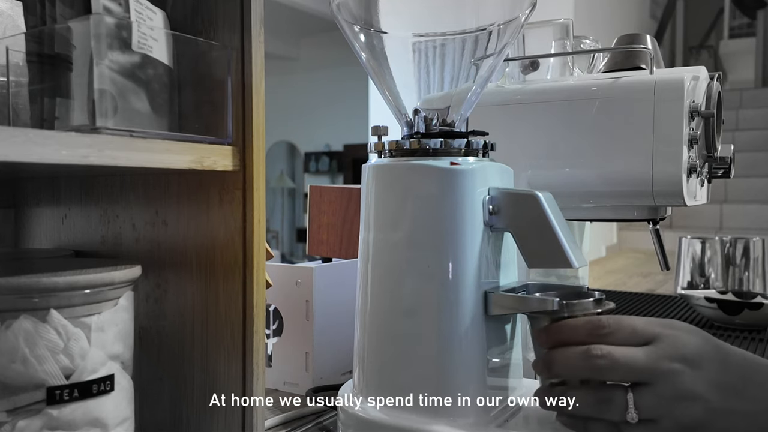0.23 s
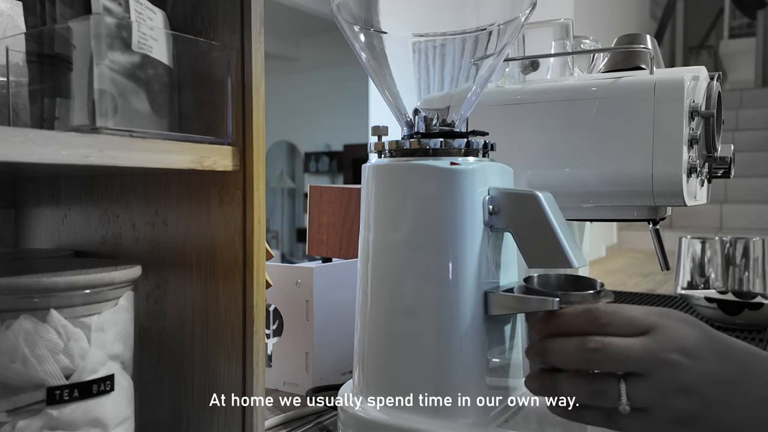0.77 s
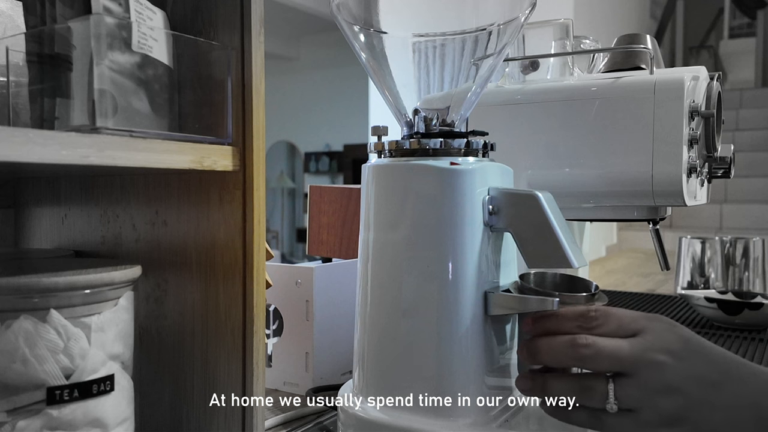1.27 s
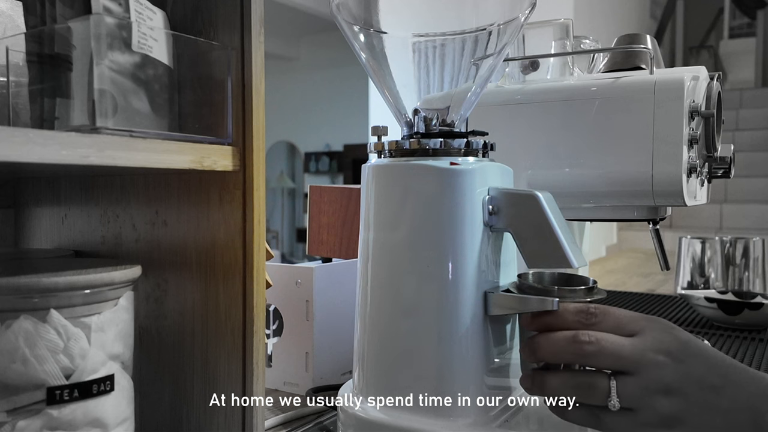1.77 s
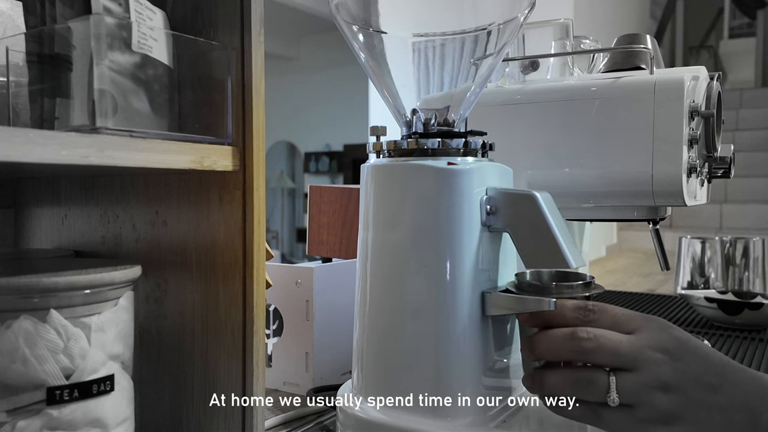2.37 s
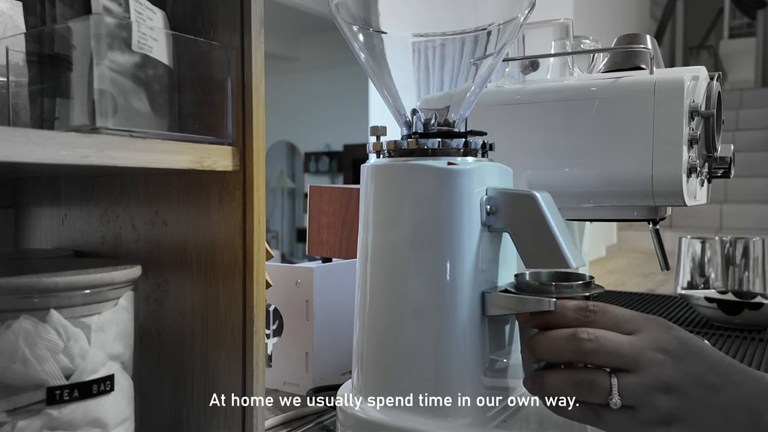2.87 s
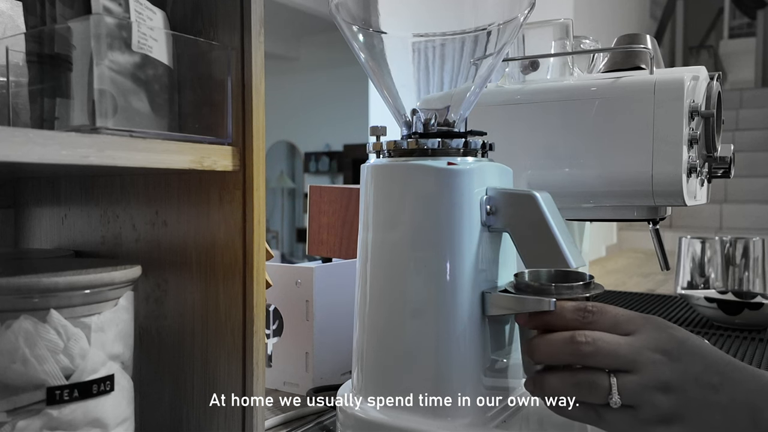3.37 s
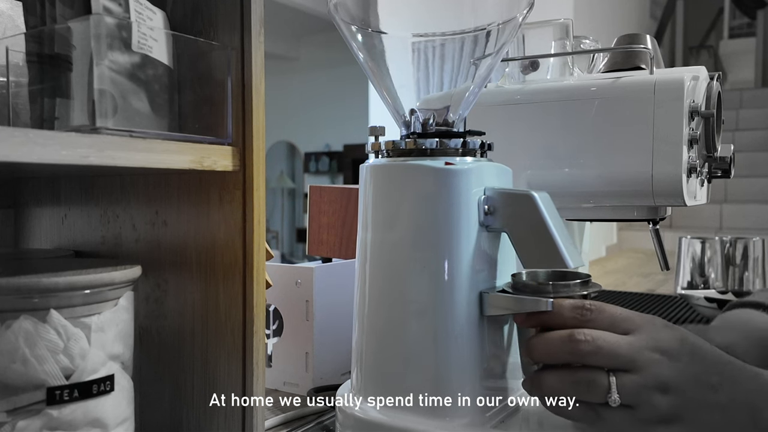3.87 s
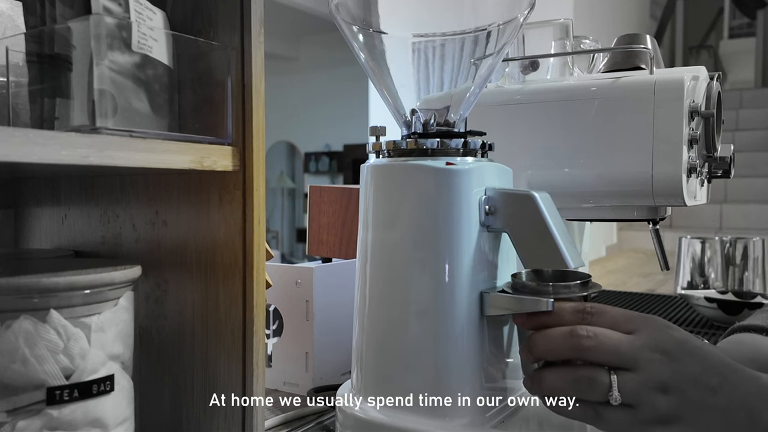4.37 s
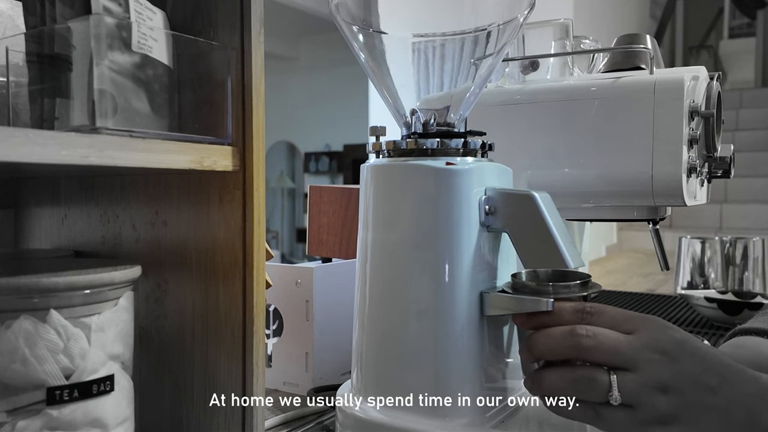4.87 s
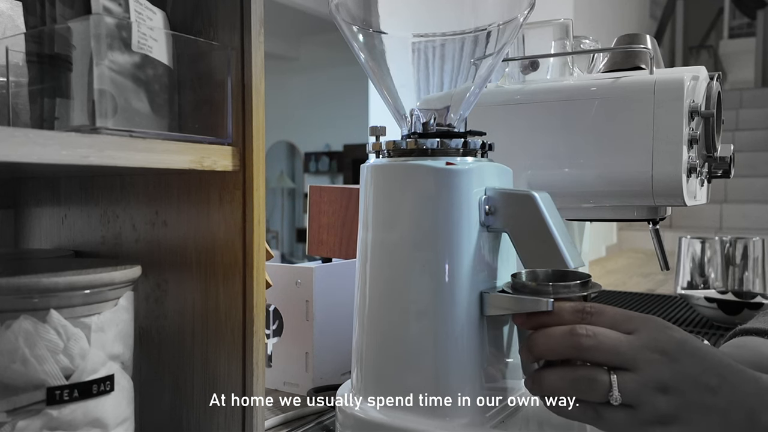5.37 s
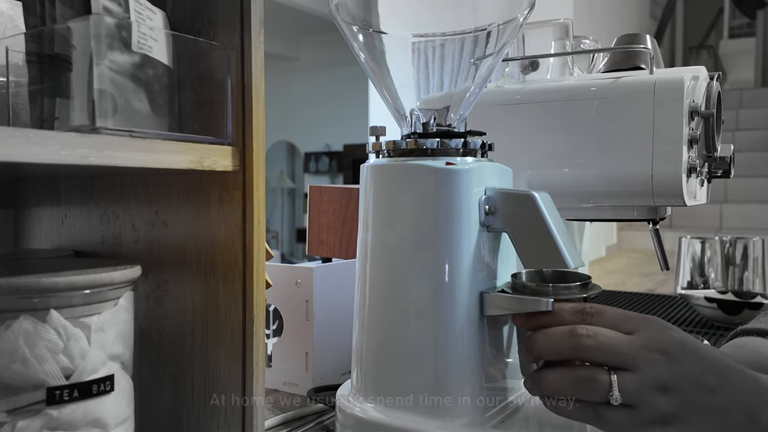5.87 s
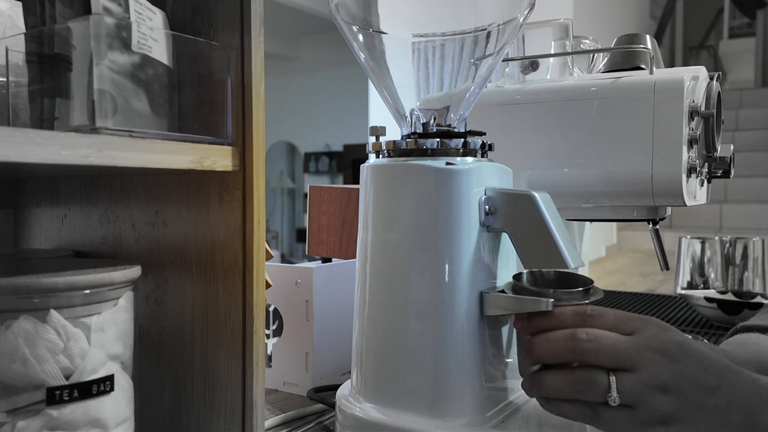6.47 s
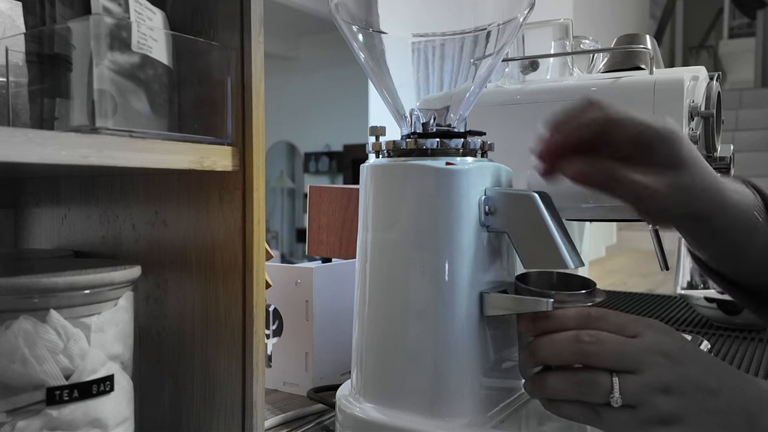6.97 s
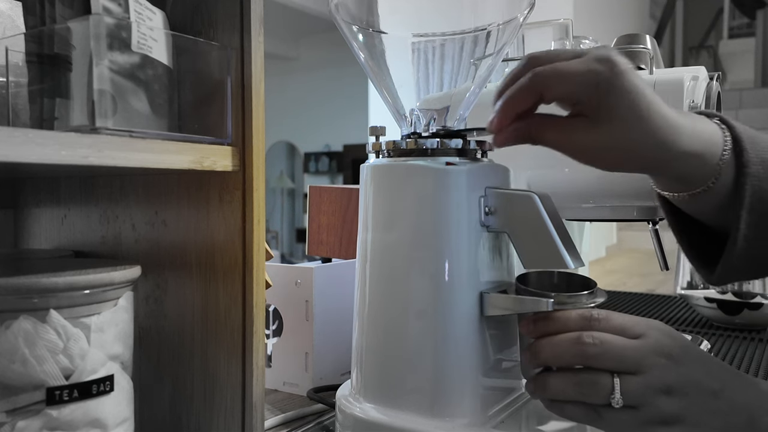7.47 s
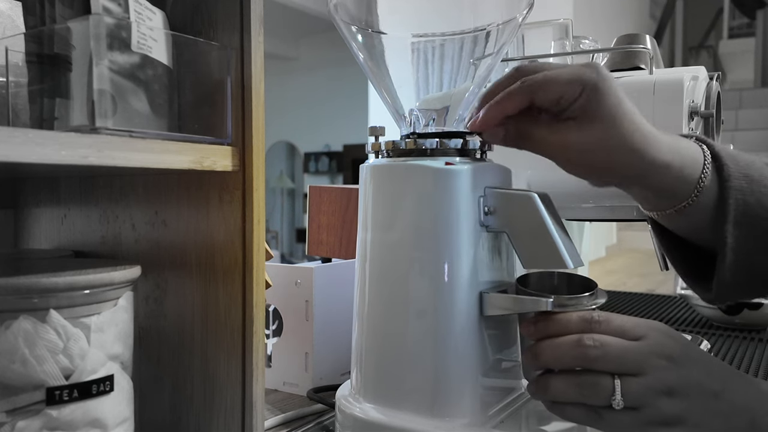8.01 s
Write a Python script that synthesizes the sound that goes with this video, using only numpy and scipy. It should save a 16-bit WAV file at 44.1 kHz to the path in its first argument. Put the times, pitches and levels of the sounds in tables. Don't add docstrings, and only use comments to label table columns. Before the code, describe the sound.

Metal filter handle knocks into a grinder fork, coffee beans grind in a short burst and a longer loud run, then collar clicks.

```python
import sys
import numpy as np
from scipy import signal
from scipy.fft import rfft, irfft, next_fast_len
from scipy.io import wavfile
from scipy.ndimage import map_coordinates

SR = 44100
rng = np.random.default_rng(int(sys.argv[2]) if len(sys.argv) > 2 else 0)


def transcribe(signal):
    frames = np.atleast_2d(signal).T
    limited = np.clip(frames, -1, 1)
    pcm = np.round(limited * 32767).astype(np.int16)
    wavfile.write(sys.argv[1], SR, pcm)


def ratio(d):
    e = np.asarray(d, float) / 20
    return 10 ** e


N = 363560
FULL_TURNS_PER_S = 140

# (on [s], off [s], spin-up time [s], coast time [s], first bite after on [s])
RUNS = [
    (2.2, 2.582, .036, .105, .016),
    (3.898, 6.559, .055, .075, .024),
]
# (frequency [Hz], width [Hz], level [dB])
FIZZ = [(6300, 480, 2), (9200, 1800, 0.5), (12500, 4000, -5)]


def unit(x):
    return x / np.sqrt(np.mean(x ** 2) + 1e-20)


def along(points, hz):
    f, v = np.transpose(points)
    return np.interp(np.log(hz + 1), np.log(f + 1), v)


def curves(tables, before):
    t = np.arange(N) / SR
    s, *cols = np.transpose(sorted(np.vstack(tables).tolist()))
    out = [np.interp(t, s, c) for c in cols]
    inside = sum((t >= rows[0][0]) & (t <= rows[-1][0]) for rows in tables)
    return [np.where(inside, out[0], before)] + out[1:]


def wobble(rate):
    knots = rng.standard_normal(int(N * rate / SR) + 4)
    return map_coordinates(knots, [np.arange(N) * rate / SR])


def filtered(x, response):
    m = next_fast_len(N + SR // 2)
    return irfft(rfft(x, m) * response(np.fft.rfftfreq(m, 1 / SR)), m)[..., :N]


def mode(f, hz, width):
    return 1j * f * width / (hz * hz - f * f + 1j * f * width)


def body(modes):
    return lambda f: sum((-1) ** k * ratio(db) * mode(f, hz, w) for k, (hz, w, db) in enumerate(modes))


def grit(rate, spread_db):
    hit = rng.random(N) < rate / SR
    return hit * rng.standard_normal(N) * ratio(spread_db * rng.exponential(size=N))


def kitchen():
    # (frequency [Hz], density [dB per Hz])
    rumble = [(15, -72), (25, -37), (43, -36), (55, -15), (101, 0), (126, -8.5), (152, -2.5), (260, -12.5),
              (340, -18.5), (523, -29), (742, -26.5), (872, -40), (971, -33.5), (2360, -38), (15500, -57)]
    # (frequency [Hz], left-right correlation)
    alike = [(60, 0.99), (180, 0.99), (550, 0.86), (1650, -0.43), (4970, -0.19), (15000, -0.24)]
    turn = lambda f: np.arccos(np.clip(along(alike, f), -1, 1)) / 2
    split = lambda f: ratio(along(rumble, f)) * [np.cos(turn(f)), np.sin(turn(f))]
    mid, side = filtered(rng.standard_normal((2, N)), split)
    fridge = ratio(-43 + 2.5 * wobble(7)) * np.sin(2 * np.pi * 100 * np.arange(N) / SR)
    return ratio(-39.5 + 0.5 * wobble(1.2)) * unit(np.array([mid + side, mid - side])) + fridge


def taps(events, bodies, rise_s, rattle, low_db, knock_db):
    push, t = np.zeros((len(bodies), N + SR)), np.arange(SR // 4) / SR
    for s, db, weight_db, tick_db, t60_s in events:
        lasts_s = np.clip(t60_s, .008, .15) * np.array([[1], [rattle], [1], [1]])
        burst = rng.standard_normal((len(bodies), len(t))) * ratio(-60 * t / lasts_s)
        burst *= 1 - np.exp(-t / rise_s)
        body_db = np.array([[11], [weight_db + low_db], [weight_db + knock_db], [tick_db + 6]])
        push[:, round(s * SR):][:, :len(t)] += ratio(db + body_db) * burst
    return sum(filtered(p[:N], body(b)) for p, b in zip(push, bodies))


def handle():
    # (time [s], peak level [dB], weight [dB], tick [dB], t60 [s])
    knocks = [(0.2374, -18.5, -13, -28, 0.045), (0.2544, -26.5, -10, -34, 0.039),
              (0.5342, -49.5, 4.5, -20, 0.08), (0.8849, -14, -0.5, -17.5, 0.037),
              (0.8969, -13.5, -3, -23.5, 0.051), (0.9264, -30, 7, -21.5, 0.048),
              (0.9644, -39.5, 6, -21.5, 0.019), (0.9934, -40, 8.5, -27, 0.036),
              (1.04, -51.5, 12.5, -28, 0.11), (1.075, -46.5, 1, -25.5, 0.017),
              (1.1341, -55.5, 6.5, -10.5, 0.034), (3.5133, -58.5, 10, -16.5, 0.021),
              (3.8085, -46, -10, -4.5, 0.03)]
    # (time [s], peak level [dB], weight [dB], tick [dB], t60 [s])
    presses = [
        (2.182, -49.5, -11.5, -9, 0.18),
        (2.199, -11, -20, -5.5, 0.037),
        (3.884, -51, -5.5, -13, 0.2),
        (3.891, -36.5, -20, -6.5, 0.03),
        (6.765, -35.5, -5.5, -17.5, 0.044),
    ]
    # (frequency [Hz], width [Hz], level [dB])
    steel = [(1420, 450, -1), (2190, 480, 0.5), (3230, 420, -3), (3800, 420, -3), (5270, 2000, -11.5)]
    # (frequency [Hz], width [Hz], level [dB])
    counter = [(238, 36, 0), (290, 18, -1.5), (337, 11, -0.5)]
    # (frequency [Hz], width [Hz], level [dB])
    fork = [(620, 35, 5), (692.6, 12, 8.5), (810, 90, -4), (940, 220, -6.5)]
    return taps([*knocks, *presses], [steel, counter, fork, FIZZ],
                rise_s=0.00026, rattle=6.0, low_db=21.5, knock_db=25)


def shaft():
    # (time [s], speed lost [turns per s])
    load = [(2.45, -2.5), (2.51, 4), (2.56, -1), (4.07, 1), (4.8, 4), (5.05, -1), (5.6, 1), (6.5, -1)]
    kick_turns_per_s = 88
    t, speed = np.arange(N) / SR, np.zeros(N)
    for on, off, up_s, coast_s, _ in RUNS:
        rising = FULL_TURNS_PER_S - (FULL_TURNS_PER_S - kick_turns_per_s) * np.exp(-np.abs(t - on) / up_s)
        speed += (t >= on) * rising * np.exp(-np.clip(t - off, 0, None) / coast_s)
    return np.clip(speed * (1 - np.interp(t, *np.transpose(load)) / FULL_TURNS_PER_S), 1, None)


def feed():
    grab_s, bite_s, bite_db = .007, .009, -6.5
    stall_s, stall_db_per_s = 0.062, 297
    trickle_db, trickle_t60_s = -24.5, .6
    t, filled, bite = np.arange(N) / SR, 0, 0
    for on, off, _, _, after in RUNS:
        empty_s = np.clip(t - off - stall_s, 0, None)
        fade = ratio(-stall_db_per_s * empty_s) + ratio(trickle_db - 60 * empty_s / trickle_t60_s)
        filled += np.clip((t - on) / grab_s, 0, 1) ** 2 * fade
        bite += ratio(bite_db) * np.exp(-((t - on - after) / bite_s) ** 2)
    return filled, bite


def housing(f):
    # (frequency [Hz], width [Hz], boost [dB])
    casing = [(635, 210, 7), (1000, 60, 11), (1230, 58, 1.5), (1417, 120, 3.5), (1750, 76, 6.5),
              (2020, 130, 6.5), (2436, 102, 7), (2850, 220, 1.5), (3390, 17, 7), (4350, 90, 2),
              (4510, 33, 3.5), (7300, 190, -3.5), (6260, 140, 4)]
    return np.prod([1 + (ratio(db) - 1) * mode(f, hz, w) for hz, w, db in casing], axis=0)


def commutator(speed, turns):
    # (multiple of bar rate, level [dB])
    multiples = [(1, 2.5), (2, 3), (3, -4.5), (4, -18)]
    bars = 16
    slow = np.clip(1 - speed / FULL_TURNS_PER_S, 0, .22)
    blur = np.clip(1 - 6 * slow, .22, 1)
    slip = 0.71 * blur * wobble(300)
    whine = 0
    for k, db in multiples:
        level_db = db - 36.5 * k * slow + 3.86 * blur * wobble(120)
        whine = whine + ratio(level_db) * np.sin(k * (2 * np.pi * bars * turns + slip))
    whine *= 1 + 0.21 * np.cos(2 * np.pi * turns)
    return whine * ratio(92 * slow) * np.clip((speed - 42) / 25, 0, 1)


def burrs(speed, turns, crush_gain, fines_gain, whine_gain, thud_gain):
    # (frequency [Hz], density [dB per Hz])
    crush_curve = [(35, -52.5), (60, -26.5), (96, -11), (170, -11.5), (194, -5.5), (294, -10), (528, -20),
                   (701, -7), (896, -14.5), (1210, 0), (1580, -2.5), (2260, -5.5), (3630, -7), (4470, -5),
                   (5500, -12.5), (7150, -42.5), (12100, -120)]
    # (frequency [Hz], density [dB per Hz])
    fines_curve = [(2820, -32), (4800, -7), (5510, -13), (6230, -12), (6670, -8.5), (8000, -10.5),
                   (9270, -9), (14600, -20), (15500, -16.5)]
    crush = unit(filtered(grit(9000, spread_db=1.57), lambda f: ratio(along(crush_curve, f)) * housing(f)))
    fines = unit(filtered(grit(16000, spread_db=2.5), lambda f: ratio(along(fines_curve, f)) * housing(f)))
    thud = filtered(crush, lambda f: 1 / (1 + (f / 2400) ** 4))
    out = thud_gain * thud
    out += crush_gain * ratio(-1.0 + 0.38 * wobble(25) + 1.4 * wobble(90)) * crush
    out += fines_gain * ratio(0.54 * wobble(25)) * fines
    return out + whine_gain * filtered(commutator(speed, turns), housing)


def cracks():
    # (time [s], peak level [dB], frequency [Hz])
    splits = [(2.2114, -3, 2162), (2.2124, 2, 1207), (2.3365, 1, 1000), (2.4514, -5.5, 2310),
              (2.4834, -2.5, 2092), (2.5854, -3.5, 2070), (3.908, -0.5, 2030), (3.9287, -1, 1730),
              (3.9556, -4, 2020), (3.9968, -5, 2050), (4.0981, -1.5, 2104), (4.4044, -3, 2060),
              (4.4438, -2.5, 2078), (4.5396, -2, 1728), (4.591, -4.5, 2040), (4.6734, -5.5, 1314),
              (4.7694, -4, 1256), (4.8299, -2, 2190), (5.1974, -7, 2160), (5.229, -1.5, 1713),
              (5.2752, 0.5, 1263), (5.4405, -5, 1702), (5.4914, -6.5, 2030), (5.5337, -5, 2260),
              (5.5894, -3.5, 2205), (5.7598, -3.5, 1716), (5.9888, -2, 2240), (6.0871, 0.5, 1214),
              (6.2023, -2, 2220), (6.5763, -1.5, 1700)]
    t60_s, rise_s, snap_t60_s = .02, .0009, .012
    out, t = np.zeros(N), np.arange(SR // 30) / SR
    for s, db, hz in splits:
        snap = np.sin(2 * np.pi * hz * t) + 0.51 * rng.standard_normal(len(t)) * ratio(-60 * t / snap_t60_s)
        out[round(s * SR):][:len(t)] += ratio(db + 1.5 - 60 * t / t60_s) * (1 - np.exp(-t / rise_s)) * snap
    return out


def grinder():
    speed, (filled, bite) = shaft(), feed()
    turns = np.cumsum(speed * (1 + .012 * wobble(30) + .008 * wobble(6))) / SR
    load_db = 0.79 * wobble(16) + 0.64 * wobble(40)
    decades = np.log10(speed / FULL_TURNS_PER_S)
    crush_gain = filled * ratio(-14 + 16 * decades)
    fines_gain = filled * ratio(-22.5 + 12 * decades)
    whine_gain = filled * ratio(-26.5 + 33 * decades)
    drag = filled * ratio(-18) * np.abs(1 - speed / FULL_TURNS_PER_S)
    gains = crush_gain, fines_gain, whine_gain, bite + drag
    near, far = ratio(load_db) * np.array([burrs(speed, turns, *gains), burrs(speed, turns, *gains)])
    rotor = np.sin(2 * np.pi * turns + 0.84 * wobble(10))
    near += crush_gain * ratio(-21 + 2.2 * wobble(9)) * rotor
    return near + cracks(), far


def hum():
    # (frequency [Hz], level [dB])
    mains = [(100, -31.5), (200, -36), (300, -41), (500, -60.5)]
    t, on = np.arange(N) / SR, 0
    for start, stop, *_ in RUNS:
        gate = np.clip((t - start) / .004, 0, 1) * np.clip((stop - t) / .03, 0, 1)
        on = on + gate * (1 + 3.2 * np.exp(-abs(t - start) / 0.02))
    return on * sum(ratio(db + 1.5 + 1.9 * wobble(9.9)) * np.sin(2 * np.pi * hz * t) for hz, db in mains)


def scrape(modes):
    shape = body(modes)
    return unit(filtered(grit(2500, spread_db=2.0), lambda f: shape(f) * np.abs(shape(f)) ** .8))


def collar():
    # (time [s], pressure [dB], dryness [dB])
    rub = [
        [(7.362, -57.5, -4), (7.455, -57.5, 3), (7.466, -44, 8), (7.49, -59.5, 0), (7.513, -56.5, -2),
         (7.565, -43.5, 1), (7.597, -39, -4.5), (7.639, -41.5, 8), (7.69, -58.5, -1.5)],
        [(7.8, -56.5, 5), (7.814, -49.5, 1.5), (7.86, -54.5, 5), (7.9, -47, 0), (7.925, -46, 2.5),
         (7.98, -72, -9)],
        [(8.14, -70, 2), (8.175, -61, -2), (8.22, -70, -2)],
    ]
    # (frequency [Hz], width [Hz], level [dB])
    rim = [(1890, 220, -7.5), (2440, 270, -3.5), (3230, 350, -0.5), (4180, 1000, -7.5), (5940, 600, -14.5)]
    # (frequency [Hz], width [Hz], level [dB])
    hopper = [
        [(740, 110, 5.5)],
        [(1030, 98, 0), (1500, 650, -24.5)],
    ]
    # (time [s], peak level [dB], weight [dB], tick [dB], t60 [s])
    detents = [(7.228, -33.5, -8.5, -23, 0.073), (7.3683, -33.5, -21, -12, 0.03),
               (7.432, -36, -12.5, -6.5, 0.026), (7.4644, -33, -32.5, -4.5, 0.027),
               (7.576, -26.5, -20, -11.5, 0.026), (7.5927, -18.5, -3.5, -16, 0.062),
               (7.636, -26.5, -8, -2.5, 0.019), (7.8092, -36, -4.5, -6.5, 0.03),
               (7.9052, -28.5, -5.5, -10.5, 0.096), (7.9244, -31, 2, -14, 0.034),
               (7.9488, -37.5, 1.5, -31, 0.03)]
    # (time [s], level [dB], frequency [Hz], t60 [s])
    pings = [(7.946, -41, 1980, 0.18), (7.905, -39.5, 1980, 0.11), (7.885, -52, 2400, 0.142),
             (7.8, -53.5, 2800, .15), (7.805, -51.5, 760, .15), (7.512, -51, 2450, 0.3),
             (0.994, -35, 665, .4), (1.085, -46, 660, .8), (7.515, -45.5, 700, .1), (7.648, -46, 680, 0.27),
             (7.6, -41, 1080, 0.26), (0.93, -36.5, 345, .3), (7.594, -41, 2800, 0.16),
             (7.81, -49, 9200, 0.14), (7.915, -40.5, 9400, 0.077), (7.54, -45.5, 3800, .1),
             (7.89, -50.5, 4900, 0.047)]
    rim_db, dry_db = curves(rub, before=-120)
    ring = scrape(rim[3:])
    ring += ratio(-3.5 - 2.0 * dry_db) * scrape(rim[:2])
    ring += ratio(-5 + 1.5 * wobble(25)) * scrape(rim[2:3])
    ring += ratio(-5.5 + .6 * dry_db) * scrape(FIZZ)
    ring += ratio(-6 - dry_db + 3 * wobble(22)) * scrape(hopper[0])
    out = ratio(rim_db - 0.5 + 1.5 * wobble(40)) * ring
    out += taps(detents, [rim, *hopper, FIZZ], rise_s=.0012, rattle=1.1, low_db=19.5, knock_db=18.5)
    t = np.arange(SR // 4) / SR
    for s, db, hz, t60_s in pings:
        level = ratio(db - 60 * t / t60_s + 4.4 * wobble(60)[:len(t)])
        out[round(s * SR):][:len(t)] += level * np.sin(2 * np.pi * hz * t + .7 * wobble(90)[:len(t)])
    return out


def pair(near, far, leads):
    # (frequency [Hz], share)
    shared = [(60, 0.92), (200, 1), (400, 0.9), (700, 0.93), (1400, 0.93), (3000, 0.44), (6000, 0.7),
              (10000, 0.5), (15000, 0.28)]
    # (frequency [Hz], left minus right [dB])
    sides = [(60, -1.5), (500, 1.5), (1170, -0.5), (1800, -1.5), (2400, -5.5), (3200, 1), (3800, 0),
             (6500, -2.5), (10500, 1), (14800, -2)]
    turn = lambda f: np.arccos(np.clip(along(shared, f), 0, 1)) / 2
    lead = lambda f: np.exp(.5j * along(leads, f) / (1 + (330 / (f + 1)) ** 4) * np.array([[1], [-1]]))
    side = lambda f: lead(f) * ratio(along(sides, f) * np.array([[.5], [-.5]]))
    alike = filtered(near, lambda f: np.cos(turn(f)) * side(f))
    return alike + filtered(far, lambda f: np.sin(turn(f)) * side(f) * [[1], [-1]])


def room(x, tail_db):
    # (frequency [Hz], t60 [s])
    decay = [(200, .6), (800, .75), (1500, .7), (2300, .64), (3300, .5), (4500, .56), (8000, .34),
             (14000, .23)]
    hz, _, z = signal.stft(rng.standard_normal((2, SR)), SR, nperseg=256)
    t = np.arange(z.shape[-1]) * 128 / SR
    tail = signal.istft(z * ratio(-60 * t / along(decay, hz)[:, None]), SR, nperseg=256)[1]
    late = np.pad(x, ((0, 0), (200, 0)))
    wet = signal.fftconvolve(late, tail / np.linalg.norm(tail[0]), axes=1)[:, :N]
    return x + ratio(tail_db) * filtered(wet, lambda f: 1 - 1 / (1 + (f / 450) ** 4))


def scene():
    # (frequency [Hz], left lead [rad])
    motor_lead = [(0, 7), (690, -1.5), (950, 1.42), (2070, 0.5), (3010, -0.5), (5340, 9), (5940, 12.5),
                  (6550, 5.5), (7670, 9), (8700, 11), (9910, 4.0), (13500, 7), (14700, 7.5), (15200, -0.5)]
    # (frequency [Hz], left lead [rad])
    hand_lead = [(300, 0.3), (1000, 0.43), (4000, 0.56), (15000, 1.2)]
    motor = pair(*grinder(), motor_lead)
    hands = handle() + collar()
    shelf = rng.standard_normal(500) * ratio(-60 * np.arange(500) / SR / 0.023)
    hands = pair(hands, signal.fftconvolve(hands, shelf / np.linalg.norm(shelf))[:N], hand_lead)
    return room(motor, tail_db=-12.0) + room(hands, tail_db=-17.5) + hum() + kitchen()


def low_pass(x):
    return signal.sosfilt(signal.butter(12, 15670, fs=SR, output="sos"), x)


def record(dry):
    hiss = ratio(-60.0) * filtered(rng.standard_normal(dry.shape), lambda f: mode(f, 19000, 6000))
    return low_pass(np.clip(dry + hiss, -1, 1))


dry = scene()
out = record(dry)
transcribe(out)
```